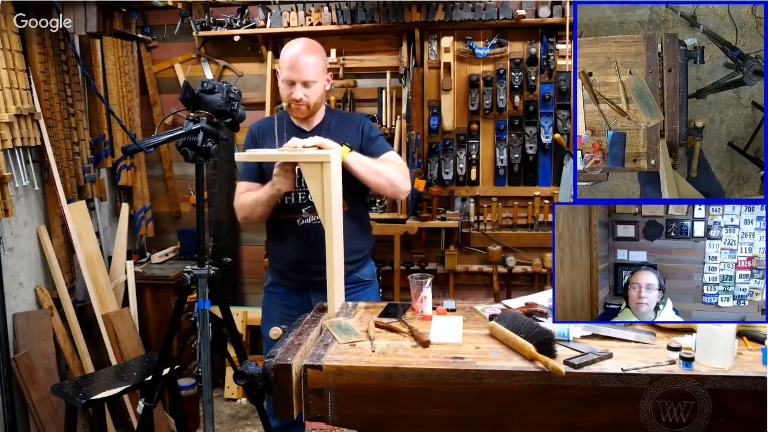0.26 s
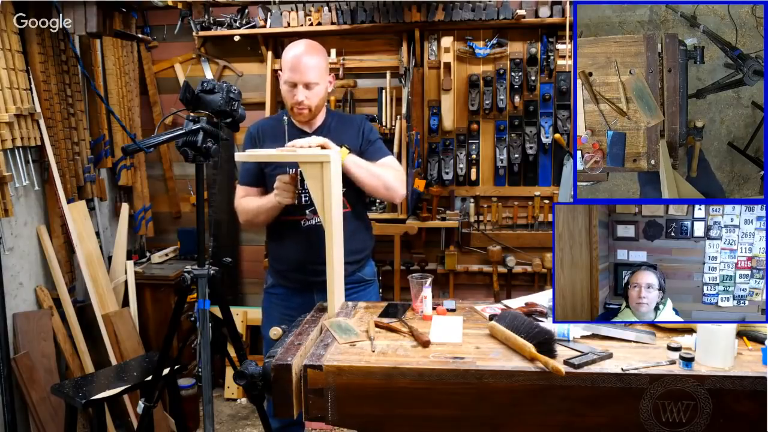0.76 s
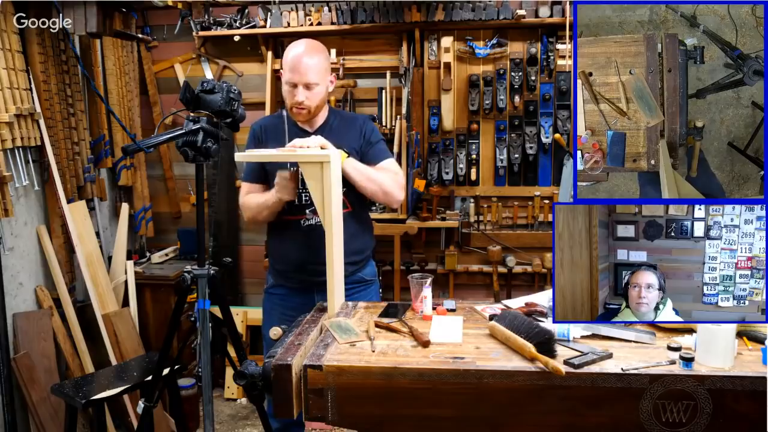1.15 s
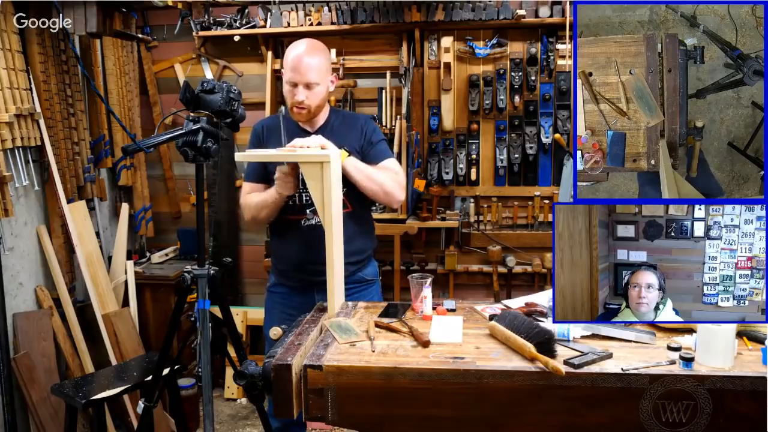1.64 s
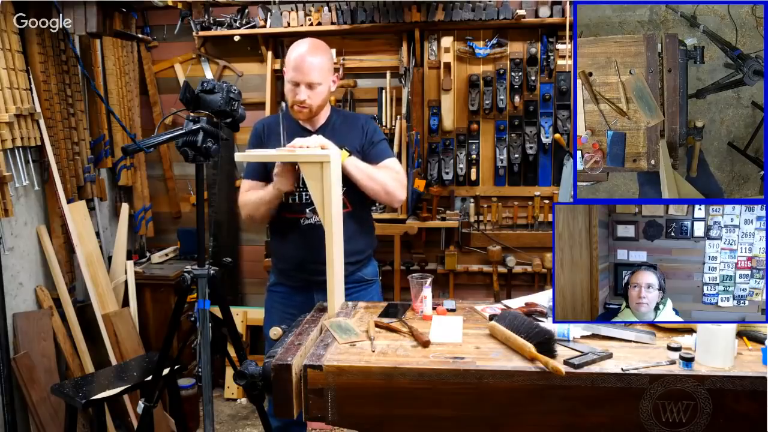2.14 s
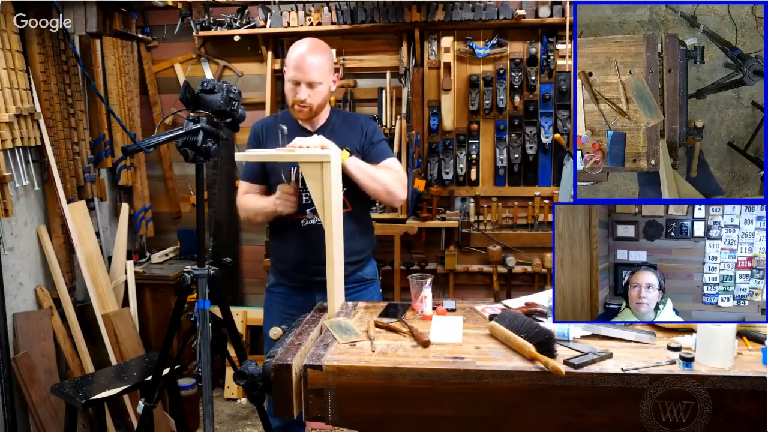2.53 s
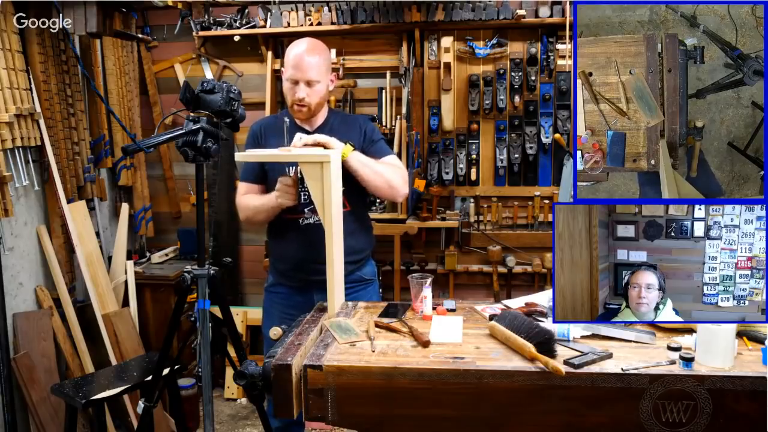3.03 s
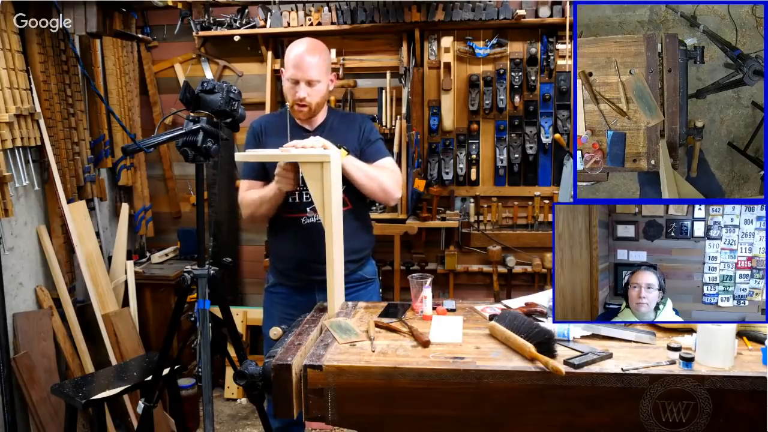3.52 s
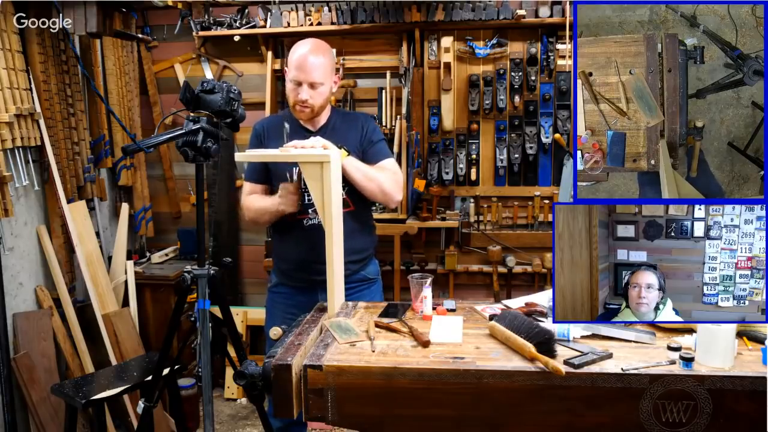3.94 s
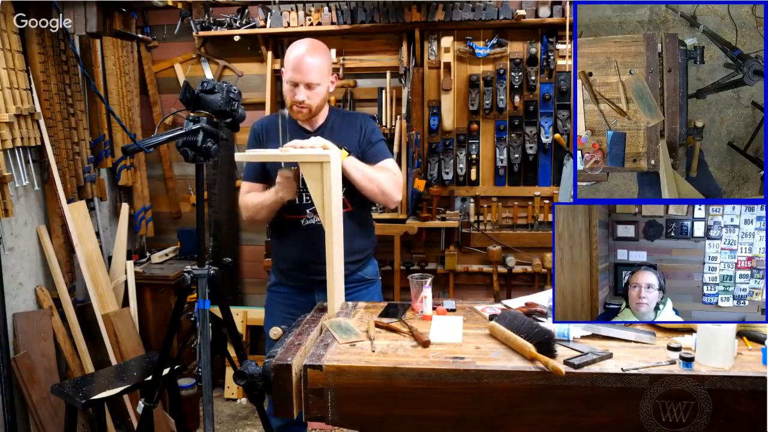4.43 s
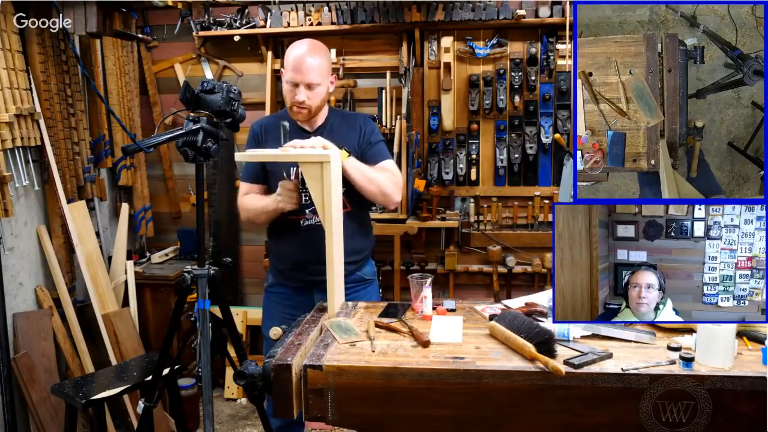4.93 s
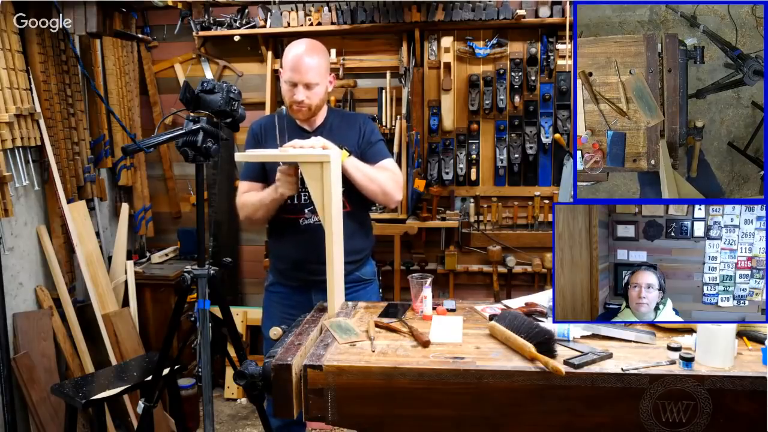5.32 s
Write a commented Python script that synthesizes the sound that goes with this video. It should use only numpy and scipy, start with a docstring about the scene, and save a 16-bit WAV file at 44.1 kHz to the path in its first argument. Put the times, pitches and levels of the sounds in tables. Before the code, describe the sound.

A hand saw rasps rapidly back and forth through a clamped wooden board, starting hesitantly, pausing briefly, then resuming in a small workshop.

```python
"""Coping saw in a small workshop

A coping saw works through a board clamped upright on a bench: one cut, then two bouts of about four a second.
Each tooth plucks the wood, so the pitch arcs with the speed of the blade: ragged where the teeth bite,
twice a cut, and mostly smoother on the way back. Torn fibres hiss in noise bursts, the steel sings in a narrow
band, the blade knocks when it sticks, and the crowded room answers briefly over its own quiet air."""
import sys
import numpy as np
from scipy import signal
from scipy.fft import rfft, irfft
from scipy.io import wavfile
from scipy.ndimage import uniform_filter1d, minimum_filter1d

SR = 44100
rng = np.random.default_rng(int(sys.argv[2]) if len(sys.argv) > 2 else 0)


def store_wav(level_fs):
    """Save 16-bit WAV to argv[1]."""
    pcm = np.round(np.clip(np.atleast_2d(level_fs), -1, 1) * 32767)
    wavfile.write(sys.argv[1], SR, pcm.T.astype(np.int16))


N = 245681
TIME = np.arange(N) / SR  # s
FFT_SIZE = 8192
BINS = np.maximum(np.arange(FFT_SIZE // 2 + 1) * SR / FFT_SIZE, 1)  # Hz

# cutting strokes: [mid-stroke t/s, length/s, top tooth rate f/Hz, roughness 0-1, first bite level/dB,
# second bite level/dB, shudder re bite level/dB, fibre hiss level/dB, sharpness of contact/dB]
CUT_STROKES = [(0.068, 0.22, 730.6, .7, -32, -29, -16.5, -46.5, -5.5),
               (0.868, 0.15, 801.7, 0.9, -24, -22, -15.5, -37, 12.5),
               (1.151, 0.115, 850, 1.1, -22.5, -18, -17, -34, 7.5),
               (1.451, 0.125, 1035, 0.4, -14, -25.5, -25, -36.5, 8),
               (1.712, 0.115, 846, .5, -10.5, -18, -17, -33, 8.5),
               (1.952, 0.115, 798, 0.49, -10, -15, -41, -35.5, 2),
               (2.196, 0.115, 761.4, .5, -10, -19, -20, -37, 1),
               (2.434, 0.115, 776, .3, -10.5, -16.5, -30, -34.5, -1.5),
               (3.385, 0.11, 780.7, 0.7, -16, -18, -7, -38.5, 6.5),
               (3.63, 0.115, 785.2, 1, -20.5, -16, -5, -37.5, -0.5),
               (3.887, 0.11, 754.7, 0.63, -12.5, -15.5, -12.5, -37.5, 2.5),
               (4.13, 0.11, 750.5, .6, -12, -17.5, -6.5, -39, -2.5),
               (4.377, 0.11, 767, 0.7, -15, -19.5, -11, -36.5, 2),
               (4.62, 0.105, 733.7, .6, -10.5, -17, -26, -39.5, 0),
               (4.85, 0.105, 728.4, 0.4, -11.5, -15.5, -17.5, -39, -3),
               (5.09, 0.09, 785, .7, -15, -22, -9.5, -35.5, 11.5),
               (5.328, 0.081, 778.4, 0.7, -12, -21.5, -23, -37, 5.5),
               (5.57, 0.1, 731, 0, -15, -27, -17, -39, 9.5)]
# return strokes: [mid-stroke t/s, length/s, top tooth rate f/Hz, roughness 0-1, pressure level/dB,
# fibre hiss level/dB, sharpness of contact/dB]
RETURN_STROKES = [(0.636, 0.15, 659, 0.3, -37.5, -55, -16), (0.987, 0.14, 777, 0.7, -28.5, -48.5, -7),
                  (1.269, 0.12, 837, 0.5, -25, -40.5, -7), (1.574, 0.12, 728, .2, -20, -36.5, -2),
                  (1.82, 0.135, 833, 0, -22.5, -36.5, 4), (2.061, 0.13, 830, .3, -20, -35, -10),
                  (2.303, 0.125, 709.7, 0.2, -19.5, -41.5, -7), (2.551, 0.15, 668, 0.01, -25, -40, 4.5),
                  (2.688, 0.06, 661, 0.68, -42.5, -50.5, -22.5), (3.128, 0.14, 701, .5, -40.5, -58.5, -13),
                  (3.509, 0.11, 712, 0.8, -30, -46, -5.5), (3.747, 0.15, 713, 0.5, -26, -43, 7),
                  (3.99, 0.17, 690, 0.53, -25.5, -47, 1.5), (4.237, 0.135, 680.6, .5, -23, -44, -2),
                  (4.49, 0.115, 729.6, .1, -18, -43, -0.5), (4.721, 0.125, 700, 0.4, -20.5, -41.5, 2),
                  (4.955, 0.135, 642.4, 0.2, -21, -45.5, 6.5), (5.199, 0.125, 729.5, 0.3, -18, -40.5, -1.5),
                  (5.428, 0.16, 662, 0.28, -19, -42, -3)]


def undb(db):
    """Decibels to gain."""
    return 10 ** (np.asarray(db) / 20)


def unit(x):
    """Scale to rms 1."""
    return x / np.sqrt(np.mean(x ** 2))


def slope(points):
    """Power response through (Hz, dB) points."""
    hz, db = np.transpose(points)
    return undb(np.interp(np.log(BINS), np.log(hz), db)) ** 2


def resonances(modes):
    """Power response of steep-sided resonances."""
    power = 0
    for hz, width, db in modes:
        detuning = hz / width * (BINS / hz - hz / BINS)
        power = power + undb(db) ** 2 / (1 + detuning ** 2) ** 2
    return power


def ring(x, power):
    """Pass x through the causal filter with this shape of power response; white noise keeps its level."""
    # folding the cepstrum gives the minimum-phase response
    cepstrum = irfft(np.log(power))
    cepstrum[FFT_SIZE // 2:] = 0
    cepstrum[0] /= 2
    response = irfft(np.exp(rfft(cepstrum)))
    return signal.fftconvolve(x, response / np.linalg.norm(response))[:N]


def lowpass(x, hz):
    """Gentle low-pass without delay."""
    return signal.sosfiltfilt(signal.butter(2, hz, fs=SR, output="sos"), x)


def flicker(rate):
    """Random levels, rate of them a second, joined by lines; spread a little under 1."""
    return np.interp(TIME * rate, np.arange(N), rng.standard_normal(N))


def swell(s, width):
    """A bell-shaped rise and fall of force around time s."""
    out = np.zeros(N)
    near = np.abs(TIME - s) < 5 * width
    out[near] = np.exp(-((TIME[near] - s) / width) ** 2 / 2)
    return out


def air():
    """The quiet workshop between strokes, as steady shaped noise."""
    # tone of the empty room: [f/Hz, relative level/dB]
    air_tone = [(25, -14), (70, -4.5), (170, 2), (350, -7), (700, -8.5), (1100, -15.5), (1500, -11.5),
                (2500, -24), (5000, -22.5), (15000, -25.5)]
    return undb(-73.5) * ring(rng.standard_normal(N), slope(air_tone))


def teeth(mid, length, top_hz, rough, scatter_db=4.0, count=121):
    """One click per tooth as the blade speeds up and slows down; rough wood makes them uneven."""
    jitter = 0.17  # share of a tooth spacing at roughness 1
    least_rough = 0.15  # of any wood
    chatter = 0.45  # roughness added by skipping, a quarter of the way along the stroke
    early, size = rng.standard_normal((count, 2)).T
    spacing = np.pi / (top_hz * length)
    travel = (np.arange(count) - count // 2) * spacing  # -1 to 1 along the stroke
    # the blade skips at first, then settles by mid-stroke and slides down in pitch
    skipping = chatter * np.clip(-2 * travel, 0, 2)
    rough = np.maximum(max(rough, least_rough), skipping)
    travel = travel + jitter * rough * early * spacing
    passing = np.abs(travel) < 1
    at = (mid + length / np.pi * np.arcsin(travel[passing])) * SR
    size = unit(undb(scatter_db * rough * size)[passing]) * np.sqrt(SR / top_hz)
    # share each click between the two nearest samples
    index = np.floor(at).astype(int)
    clicks = np.zeros(N + 2)
    np.add.at(clicks, np.clip(index, 0, N + 1), size * (1 - at % 1))
    np.add.at(clicks, np.clip(index + 1, 0, N + 1), size * (at % 1))
    return clicks[1:-1]


def strokes(table, force_db, rub_power, hiss_power, crumble_db, skim, skim_hz=560):
    """Tooth clicks of a set of strokes, with the rubbing force and hiss level that follow the blade's speed."""
    clicks, rub, hiss, pace = np.zeros((4, N))
    crumbs = rng.standard_normal(N)
    crumbs = crumbs - lowpass(crumbs, 1200)  # crumbs are too small to make bass
    for (mid, length, top_hz, rough, *_, hiss_db, _), rub_db in zip(table, force_db):
        rough = np.clip(rough, 0, 1)
        during = np.abs(TIME - mid) < length / 2
        speed = np.abs(np.cos(np.pi * (TIME[during] - mid) / length))
        clicks += teeth(mid, length, top_hz, rough)
        clicks[during] += undb(crumble_db) * rough * crumbs[during]  # wood crumbles between the teeth
        rub[during] += undb(rub_db) * speed ** rub_power
        hiss[during] += undb(hiss_db) * speed ** hiss_power
        pace[during] = speed
    # a fast blade skims: the sound below the tooth rate thins until it slows again
    clicks = clicks - skim * pace ** 2 * lowpass(clicks, skim_hz)
    return clicks, rub, hiss


def bites():
    """Force of the teeth digging in, twice a cut and once a return, and the shudder that the cuts give the board."""
    # a cut bites as the blade gathers speed and again just past mid-stroke
    first_lead_s, first_width_s = 0.022, 0.0084
    second_lag_s, second_width_s = 0.016, 0.01
    # on the way back the teeth drag once, just past mid-stroke
    drag_lag_s, drag_width_s, drag_db = 0.016, 0.019, -3  # level re the pressure
    force, shudder = np.zeros((2, N))
    for mid, _, _, _, first_db, second_db, shudder_db, _, _ in CUT_STROKES:
        first = undb(first_db) * swell(mid - first_lead_s, first_width_s)
        second = undb(second_db) * swell(mid + second_lag_s, second_width_s)
        dig = first + second
        force += dig
        shudder += undb(shudder_db) * dig
    for mid, _, _, _, pressure_db, _, _ in RETURN_STROKES:
        force += undb(pressure_db + drag_db) * swell(mid + drag_lag_s, drag_width_s)
    return force, shudder


def contact(x, split_hz=1250, wander_db=7.0):
    """Sharp contact favours the overtones, soft contact the tooth rate; it shifts a little within each stroke."""
    rows = np.array(sorted((row[0], row[-1]) for row in list(CUT_STROKES) + list(RETURN_STROKES)))
    sharp_db = np.interp(TIME, rows[:, 0], rows[:, -1]) + wander_db * flicker(70)
    low = lowpass(x, split_hz)
    return low * undb(-sharp_db / 2) + (x - low) * undb(sharp_db / 2)


def patchy(x, depth_db, low_hz, high_hz, rate=22, count=6):
    """As the contact slides along the blade, neighbouring bands of x swell and fade on their own."""
    edges_hz = np.geomspace(low_hz, min(high_hz, 0.4 * SR), count)
    below = [0] + [lowpass(x, hz) for hz in edges_hz] + [x]
    return sum((upper - lower) * undb(depth_db * flicker(rate)) for lower, upper in zip(below, below[1:]))


def board(drive, jolts):
    """The board and saw frame ring at their resonances when teeth pluck or the blade jolts them."""
    # resonances of board and saw frame: [f/Hz, width/Hz, relative level/dB]
    board_modes = [(167, 77, -11), (267, 60, -24), (378, 20, -24.5), (422, 81, -8), (450, 38, -10.5),
                   (595, 81, -2.5), (665.3, 45, -1), (718.3, 56, 0.5), (787, 34, -4), (949.7, 73, -5.5),
                   (1042, 27, -13.5), (1288, 260, -11.5), (1383, 85, -10), (1451, 133, -2),
                   (1530, 203, -1.5), (1720, 150, -14), (1921, 197, -9), (2120, 250, -19),
                   (2413, 324, -19.5), (2814, 110, -26)]
    # broad response between the resonances: [f/Hz, relative level/dB]
    board_base = [(30, -67), (80, -36), (200, -27.5), (520, -12.5), (1100, -16), (2500, -24), (3500, -48),
                  (5000, -42.5), (12000, -49.5)]
    plucked = patchy(contact(drive), depth_db=3.5, low_hz=456, high_hz=2200)
    return ring(plucked + jolts, resonances(board_modes) + slope(board_base))


def clamped_sway(push):
    """The tall clamped piece sways at its low resonances under the push of the blade."""
    # low resonances of the clamped piece: [f/Hz, width/Hz, relative level/dB]
    sway_modes = [(73.5, 28, -21.5), (116.3, 54, -14), (171, 27, -8.5), (260.5, 96, -12.5), (360, 58, -1),
                  (411.7, 38.4, 6.5)]
    return ring(push, resonances(sway_modes))


def frame(clicks, low_hz=260, high_hz=680):
    """The saw frame hums along with the tooth rate, most of all as the blade slows."""
    return signal.sosfilt(signal.butter(3, [low_hz, high_hz], "band", fs=SR, output="sos"), clicks)


def fibres(clicks, spectrum, snap_s, steady, grain_db):
    """Each tooth sets off a tiny burst of hiss over a steadier scrape."""
    keep = np.exp(-1 / (snap_s * SR))
    bursts = unit(signal.lfilter([1], [1, -keep], np.abs(clicks)))
    grain = undb(grain_db * flicker(250))
    hiss = (steady + bursts) * grain * rng.standard_normal(N)
    return ring(unit(hiss), slope(spectrum))


def blade(width_hz=420):
    """The scraped steel rings in a narrow band of noise that glides in pitch."""
    # song of the thin blade as it is steered through the kerf: [t/s, f/Hz]
    blade_song = [(0, 5672), (.9, 5310), (1.5, 5454), (1.85, 6700), (2.6, 6735), (3.1, 7140), (3.5, 7340),
                  (3.9, 7050), (4.4, 6380), (5.5, 6500)]
    hz = np.interp(TIME, *np.transpose(blade_song))
    band = lowpass(rng.standard_normal(N) + 1j * rng.standard_normal(N), width_hz)
    return unit(np.real(band * np.exp(2j * np.pi * np.cumsum(hz) / SR)))


def bench(x, echo_db=-10, lags_s=(0.0019, 0.0043)):
    """The board and the bench top throw the sound straight back."""
    return x + undb(echo_db) * sum(np.interp(TIME - lag, TIME, x, left=0) for lag in lags_s)


def knocks(soft_hz=2600, rattle_hz=900, rattle_db=-14, rattle_s=0.026):
    """A woody jolt of decaying noise that dies away in a rattle of the frame."""
    # the blade sticks or is set down: [t/s, level of the jolt/dB, decay/s]
    knock_times = [(0.029, -27, 0.0088), (0.264, -55.5, 0.0055), (.675, -16, 0.0066), (2.508, -9, 0.0023),
                   (2.911, -58.5, 0.0094)]
    jolt, rattle = np.zeros((2, N))
    for s, db, decay in knock_times:
        age = np.abs(TIME - s)
        started = TIME >= s
        jolt += undb(db) * started * np.exp(-age / decay)
        rattle += undb(db + rattle_db) * started * np.exp(-age / rattle_s)
    noise = rng.standard_normal(N)
    return lowpass(jolt * noise, soft_hz) + lowpass(rattle * noise, rattle_hz)


def workshop(x, wet_db=-13, t60_low=0.17, t60_high=0.12, split_hz=900, delay_s=0.018, size=22050):
    """A short diffuse echo from walls full of tools; the lows last longer."""
    t = np.arange(size) / SR
    low_pass = signal.butter(2, split_hz, fs=SR, output="sos")
    high_pass = signal.butter(2, split_hz, "high", fs=SR, output="sos")
    low = signal.sosfilt(low_pass, rng.standard_normal(size)) * np.exp(-np.log(1000) * t / t60_low)
    high = signal.sosfilt(high_pass, rng.standard_normal(size)) * np.exp(-np.log(1000) * t / t60_high)
    tail = (low + high) * (1 - np.exp(-t / delay_s))  # the echo builds up gradually
    return x + undb(wet_db) * signal.fftconvolve(x, tail / np.linalg.norm(tail))[:N]


def scene():
    """The teeth drive the wood and shake the clamped piece, fibres hiss, the blade sings, and the room answers."""
    # hiss of tearing fibres: [f/Hz, relative level/dB]
    tear_tone = [(1500, -7), (3000, 6.5), (4000, -9), (5300, -2), (6500, 2.5), (7900, -4.5), (8800, 0.5),
                 (10300, -5.5), (12200, -1.5), (14000, -4.5), (15500, -16)]
    # hiss of teeth sliding back: [f/Hz, relative level/dB]
    slide_tone = [(1500, -9.5), (3000, 6.5), (3800, -6), (5300, -6), (6800, -4.5), (7900, -11), (9200, -7),
                  (10800, -11.5), (12500, -9.5), (14000, -11.5), (15500, -26)]

    # between the bites the teeth only rub
    cut_rub_db = np.array([(row[4] + row[5]) / 2 for row in CUT_STROKES]) - 8.5  # re the mean of the two bites
    back_rub_db = np.array([row[4] for row in RETURN_STROKES]) - 3  # re the pressure
    cut, cut_rub, cut_hiss = strokes(CUT_STROKES, cut_rub_db, rub_power=0.63, hiss_power=1.6,
                                     crumble_db=-2.5, skim=0.18)
    back, back_rub, back_hiss = strokes(RETURN_STROKES, back_rub_db, rub_power=1.2, hiss_power=1.9,
                                        crumble_db=-13.5, skim=0.53)
    force, shudder = bites()
    clicks = cut + back
    jolts = knocks()

    catch = undb(2.84 * flicker(140))  # hard and soft grain under the blade
    drive = (cut * cut_rub + back * back_rub + clicks * force) * catch
    wood = board(drive, jolts)
    push = clicks * shudder * undb(6.5) + cut * cut_rub * undb(-12.5) + jolts * undb(-7.5)
    sway = clamped_sway(push)
    hum = frame(back * back_rub) + frame(cut * (cut_rub + force)) * undb(-3.0)

    tear_level = cut_hiss * (undb(-7.5) + undb(7.5) * force)  # harder bites tear more
    tear = fibres(cut, tear_tone, snap_s=0.0019, steady=1.4, grain_db=4.5) * tear_level
    slide = fibres(back, slide_tone, snap_s=0.00038, steady=9.9, grain_db=4.0) * back_hiss * undb(-4)
    hiss = bench(patchy(tear + slide, depth_db=1.0, low_hz=3500, high_hz=11000))
    steel = blade() * (tear_level * undb(-5.5) + back_hiss * undb(-10))

    saw = undb(-2.5) * wood + sway + hum + hiss + steel
    return (workshop(saw) + air())[None]


def record(dry, ceiling=1.0, size=221):
    """The recorder eases its gain down on peaks above the ceiling and cuts the top of the treble."""
    top_hz = 15700
    room_left = np.minimum(1, ceiling / (np.abs(dry) + 1e-9))
    gain = uniform_filter1d(minimum_filter1d(room_left, size), size)
    return signal.sosfilt(signal.ellip(10, 0.2, 80, top_hz, fs=SR, output="sos"), dry * gain)


dry = scene()
out = record(dry)
store_wav(out)
```